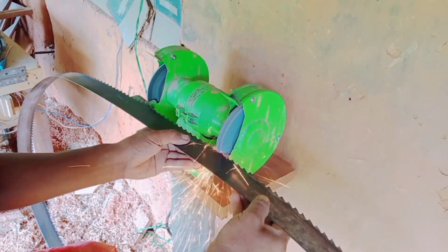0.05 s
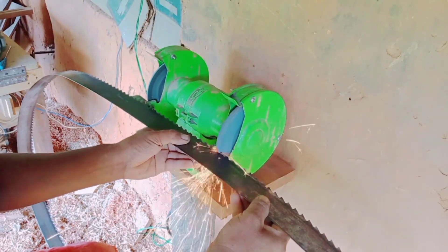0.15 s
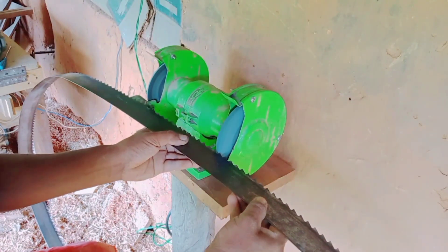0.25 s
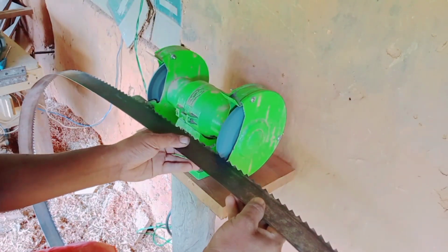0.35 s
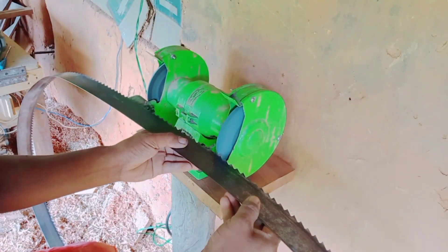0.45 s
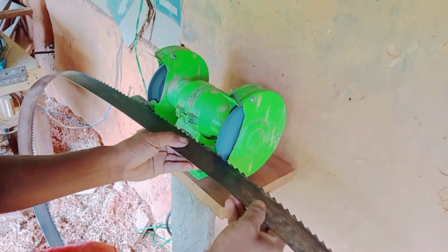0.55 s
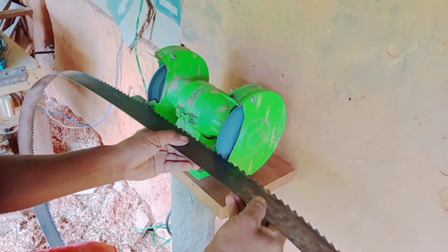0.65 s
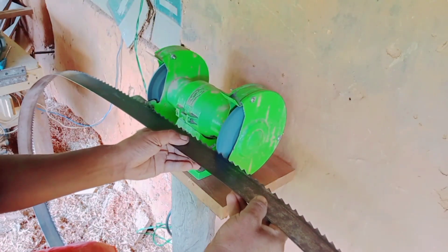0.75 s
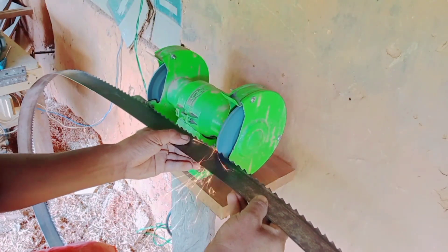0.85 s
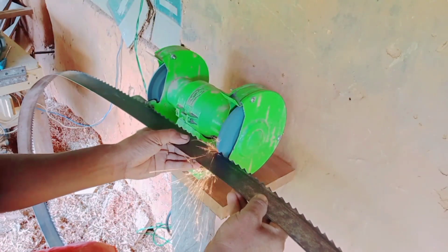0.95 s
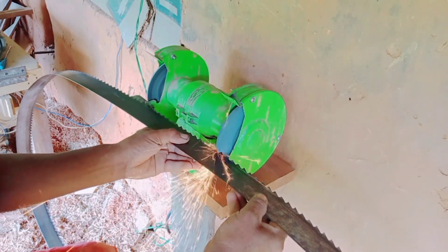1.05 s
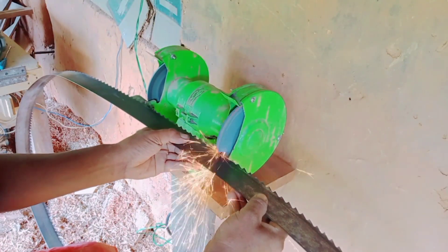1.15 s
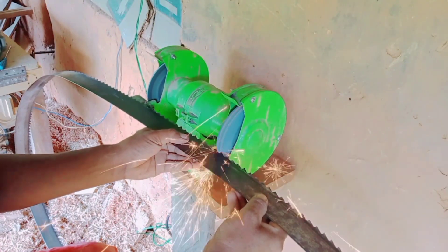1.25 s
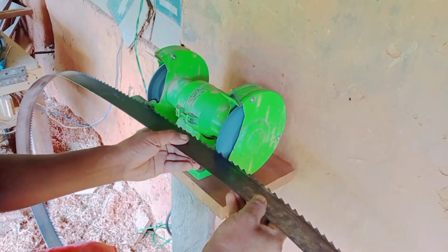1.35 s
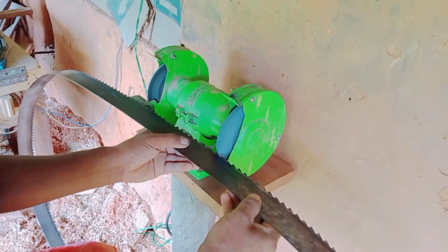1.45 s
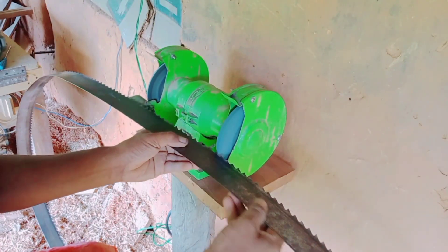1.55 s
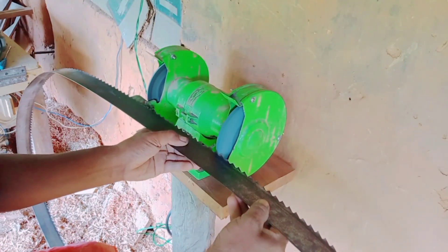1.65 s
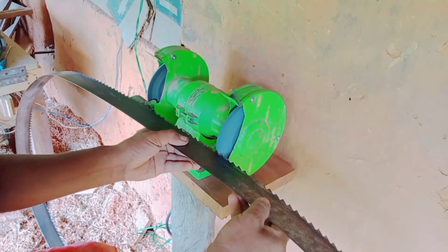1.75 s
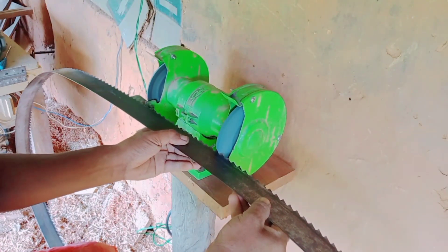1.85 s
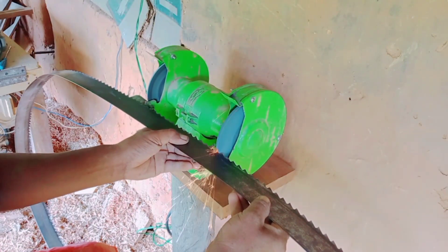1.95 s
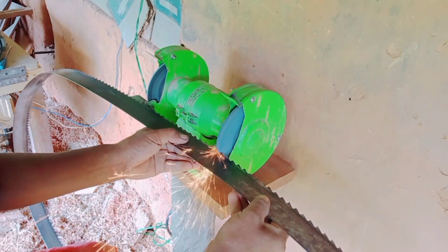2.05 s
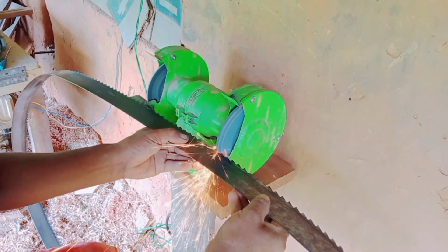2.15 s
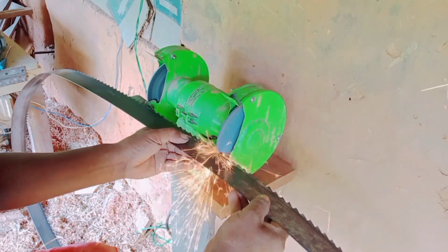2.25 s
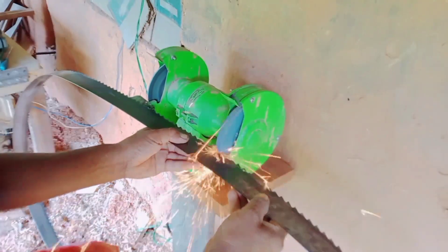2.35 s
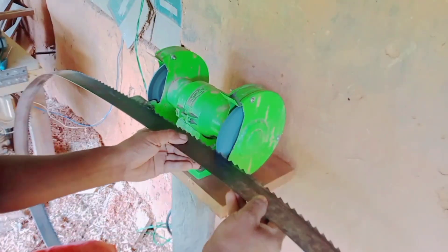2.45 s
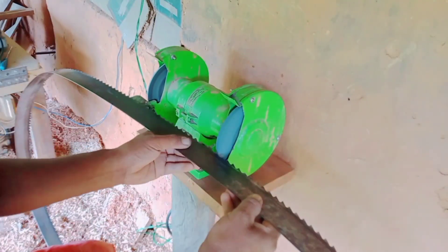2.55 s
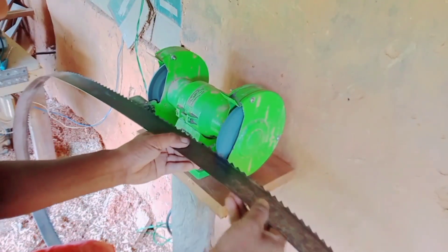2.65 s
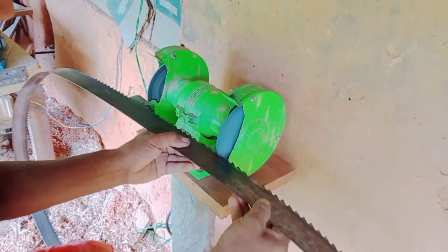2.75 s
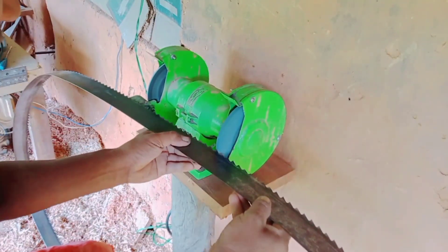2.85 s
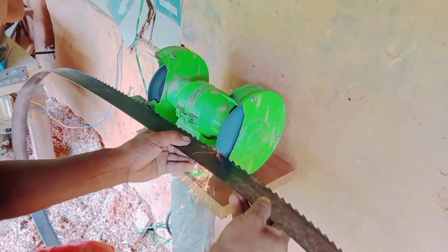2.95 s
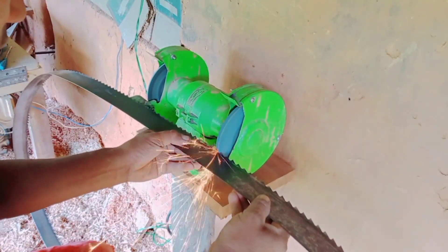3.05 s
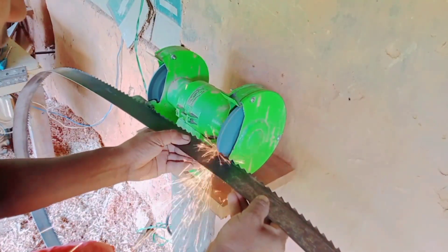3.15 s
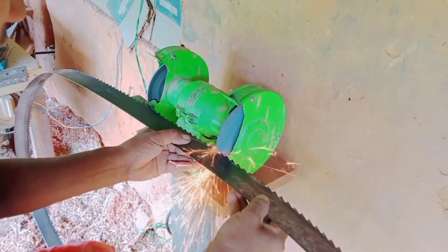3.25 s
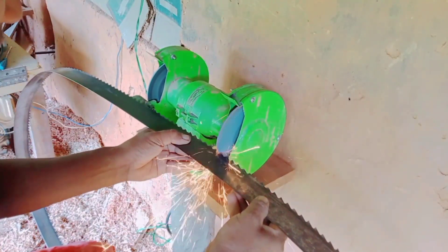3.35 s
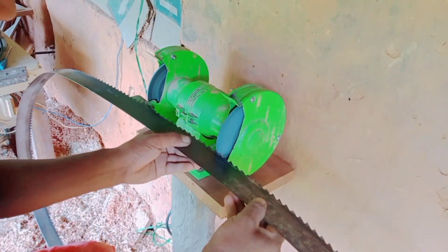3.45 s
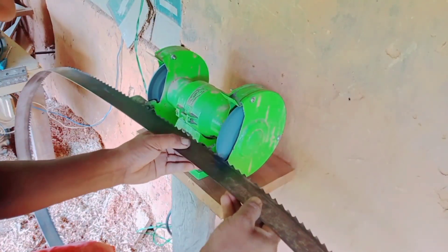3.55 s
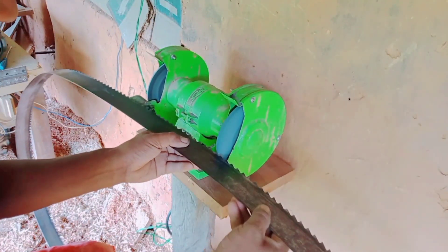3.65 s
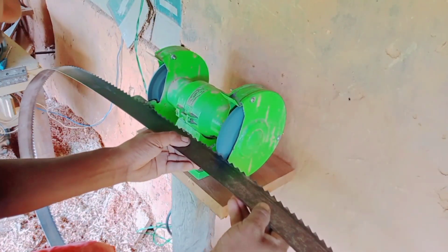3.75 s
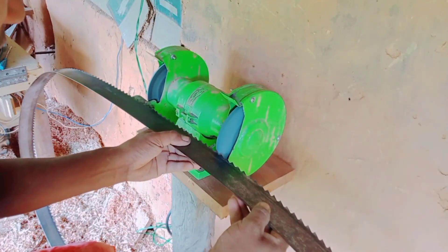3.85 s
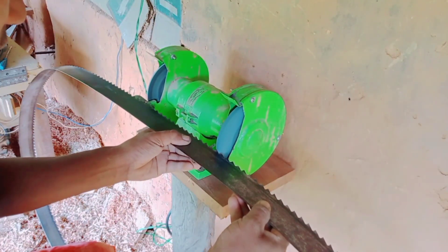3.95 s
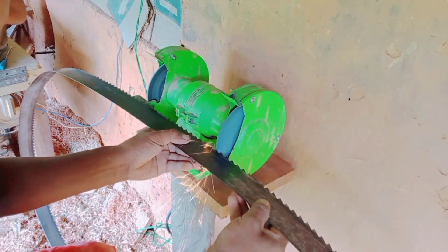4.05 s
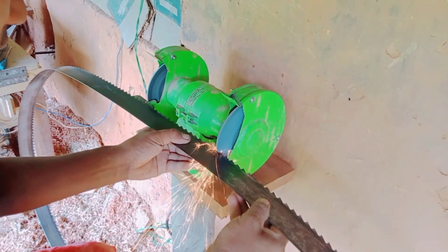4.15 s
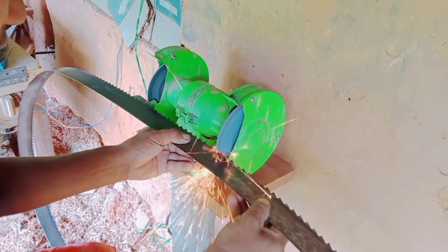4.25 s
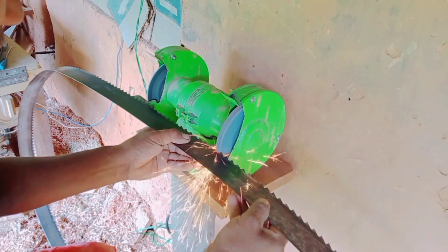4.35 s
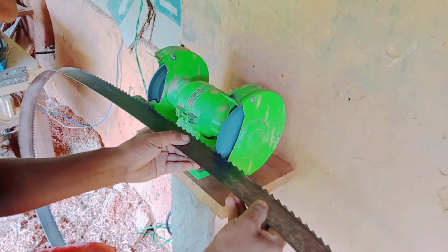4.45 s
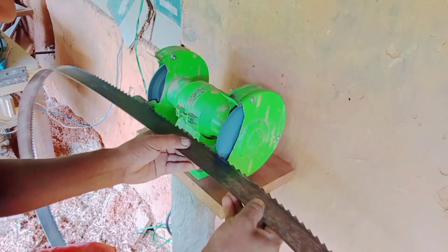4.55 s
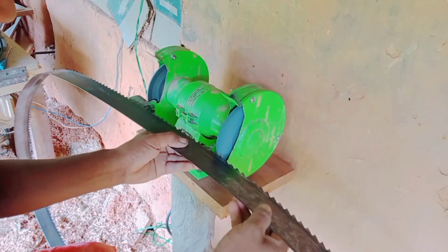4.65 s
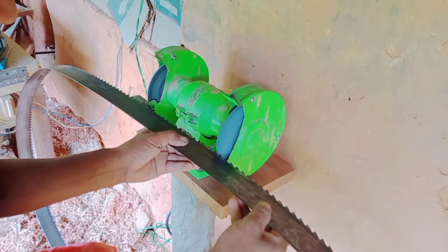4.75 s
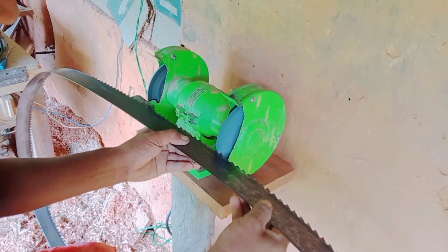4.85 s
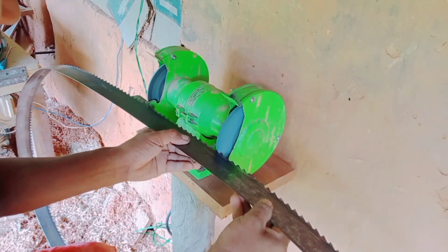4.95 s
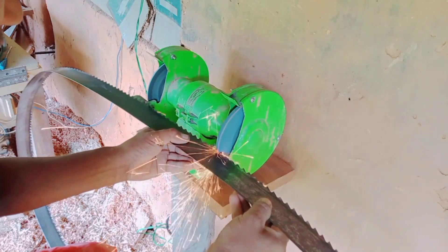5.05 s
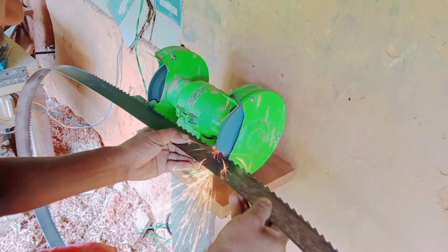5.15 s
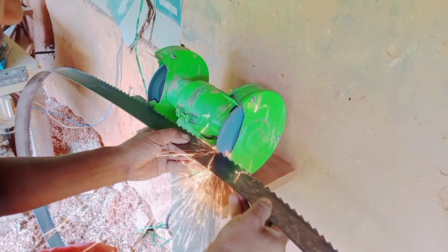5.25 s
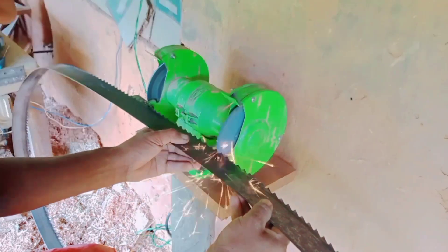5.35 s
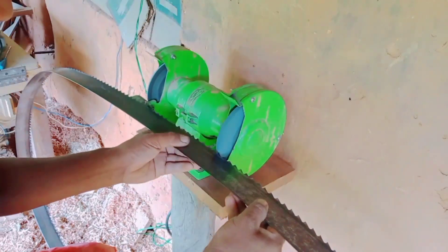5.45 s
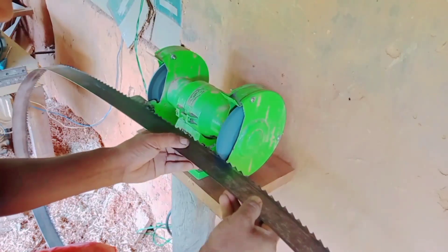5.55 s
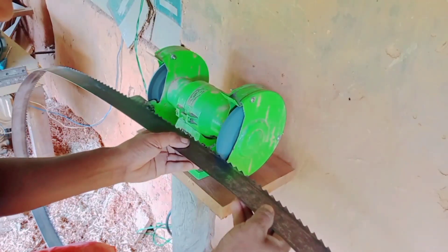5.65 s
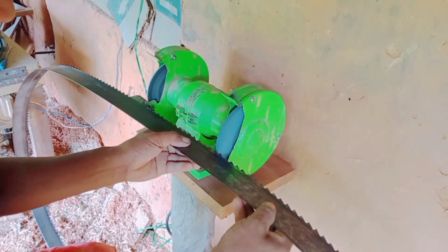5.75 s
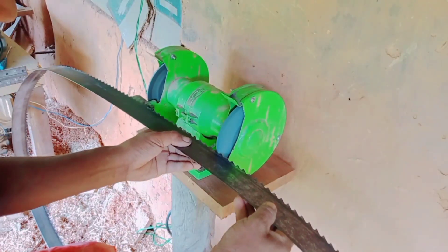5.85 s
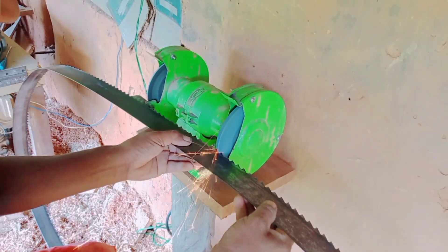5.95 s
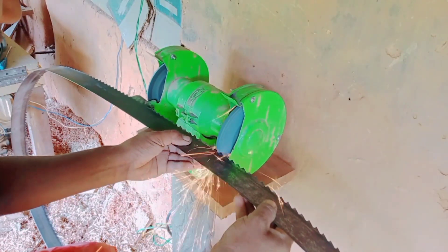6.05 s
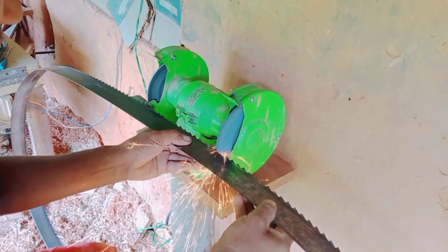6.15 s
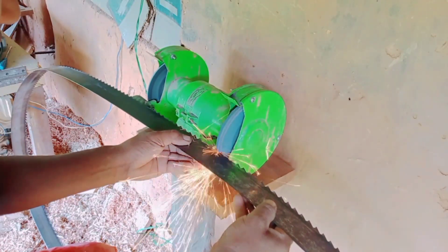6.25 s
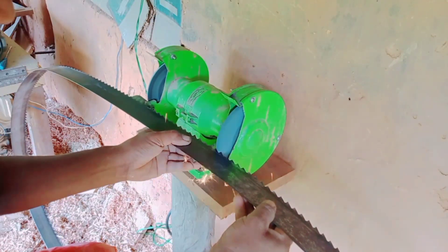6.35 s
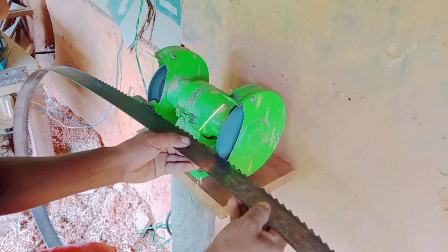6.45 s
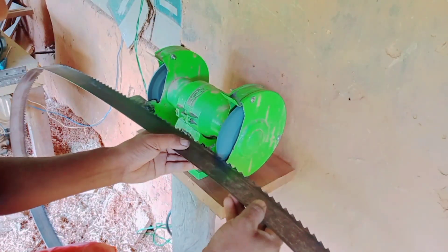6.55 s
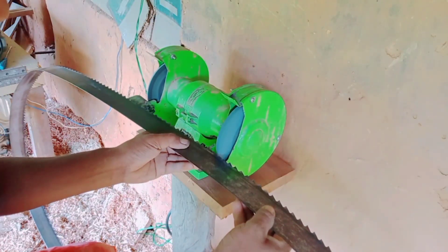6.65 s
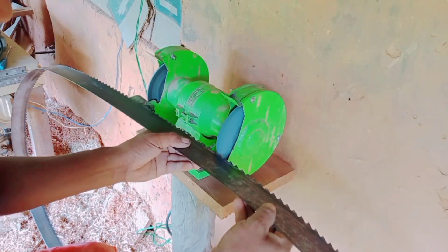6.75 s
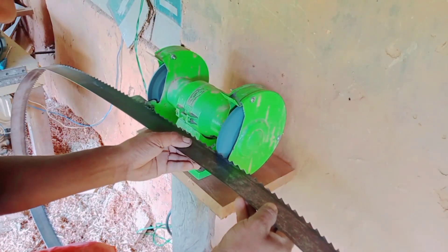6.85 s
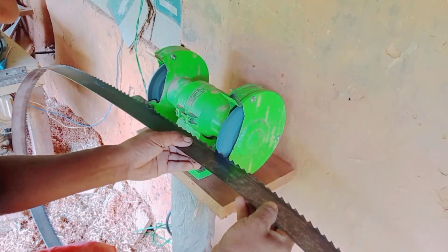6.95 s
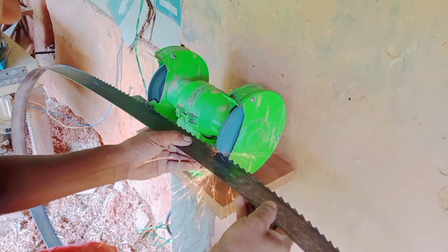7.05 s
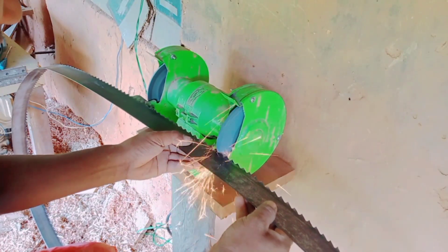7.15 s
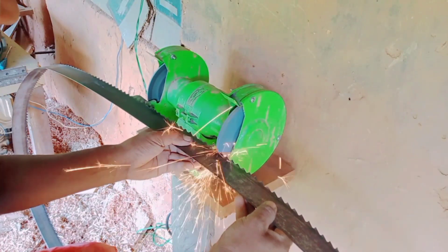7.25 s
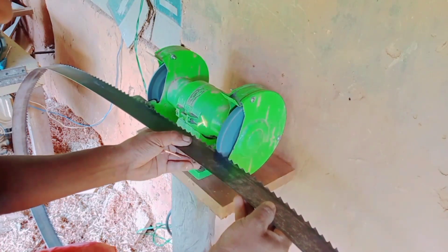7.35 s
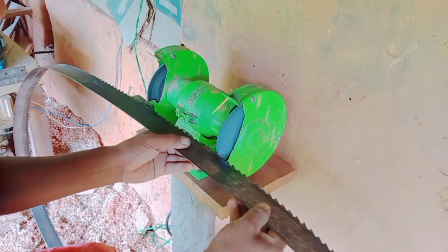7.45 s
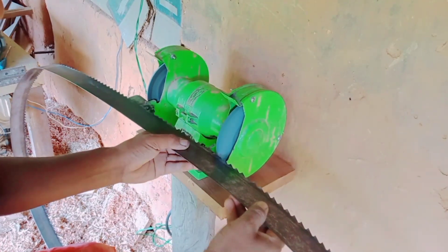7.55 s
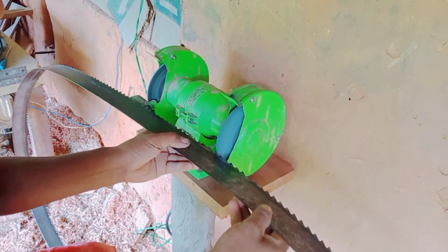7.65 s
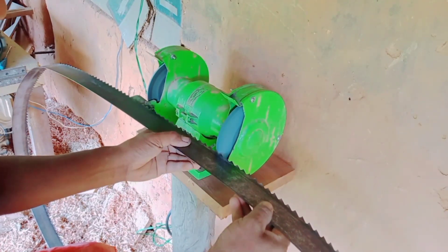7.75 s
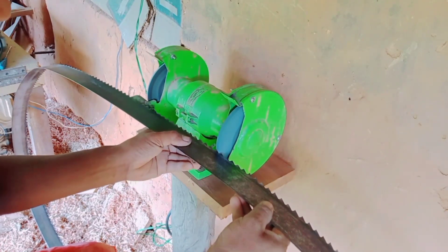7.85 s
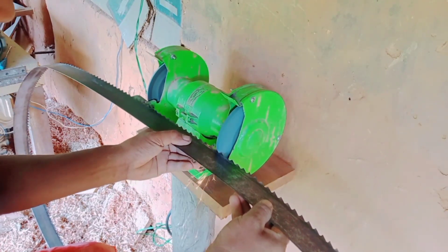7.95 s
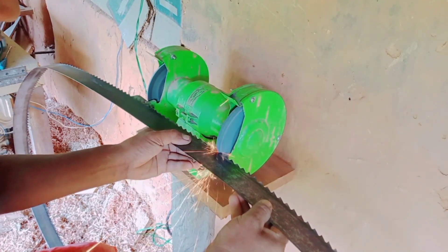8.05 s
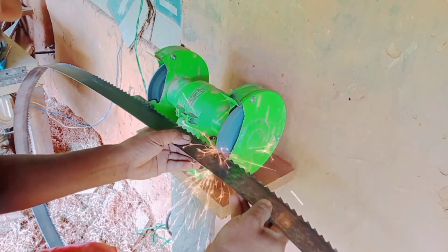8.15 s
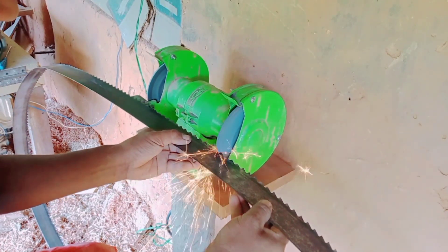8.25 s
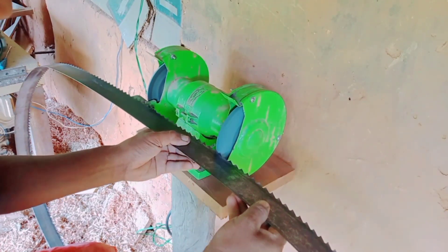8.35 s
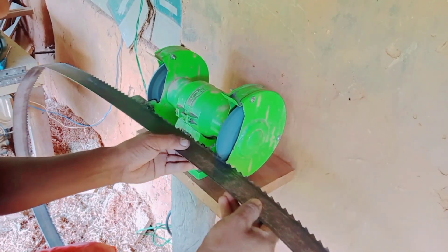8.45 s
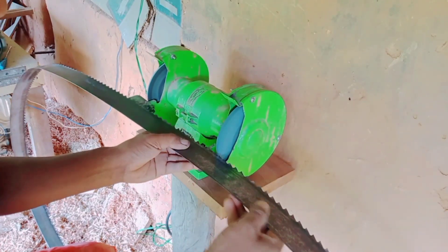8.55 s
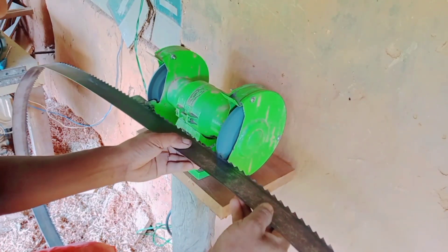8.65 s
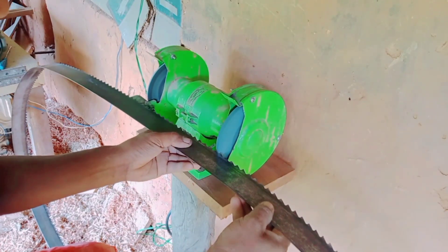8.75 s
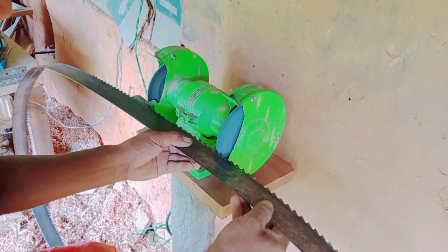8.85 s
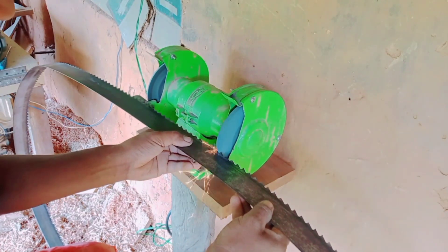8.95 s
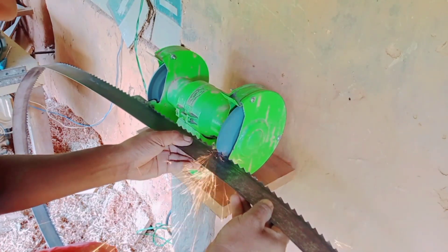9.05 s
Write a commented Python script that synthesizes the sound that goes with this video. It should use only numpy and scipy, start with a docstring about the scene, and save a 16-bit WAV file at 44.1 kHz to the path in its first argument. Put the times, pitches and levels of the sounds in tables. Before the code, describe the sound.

A bench grinder sharpens a saw blade in even, gritty bursts with light metallic ringing, its motor whirring faintly between them.

```python
"""Short, crackling strokes of steel on a grinding wheel, about one a second, close at the bench, dry, mono.
The teeth of a long band-saw blade are being sharpened one by one. At first only the high spot of the
wheel knocks the steel, once a turn; pressed harder, the grit crackles all round.
The blade rings on briefly after each stroke, and the grinder's quiet motor picks up speed again."""
import sys
import numpy as np
from scipy import signal
from scipy.fft import rfft, irfft
from scipy.io import wavfile
from scipy.ndimage import uniform_filter1d

SR = 44100
rng = np.random.default_rng(int(sys.argv[2]) if len(sys.argv) > 2 else 0)


def pcm_store(signal):
    """Save signal as 16-bit PCM."""
    levels = np.round(np.clip(np.atleast_2d(signal), -1, 1) * 32767)
    wavfile.write(sys.argv[1], SR, levels.astype(np.int16).T)


N = 401310
TIME = np.arange(N) / SR

# One stroke a row: touch t/s, high spot's first knock t/s, lift-off t/s, bedding-in/s, biting share of a
# turn once bedded in/0-1, extra force at touch/dB, cutting force/dB, extra force at lift-off/dB,
# blade ring level/dB, tooth f/Hz, tooth ring level/dB
STROKES = [(0.0, 0.007, 0.257, 0.094, 0.61, -7, -28.5, 0, -53.5, 4300, -18),
           (0.909, 0.9203, 1.351, .31, 0.73, 8, -29, 0, -53, 4402, -20),
           (1.965, 1.9786, 2.451, 0.4, 0.96, -21.5, -27.5, -5, -53, 5600, -6.5),
           (2.993, 3.0046, 3.430, 0.42, 0.99, -16, -27, -2, -52.5, 3900, -2),
           (4.040, 4.0429, 4.438, .35, 0.98, -3, -28, -3.5, -53.5, 4550, -1),
           (5.032, 5.0342, 5.413, .18, 0.77, 4.5, -28, 1, -51.5, 4700, -27),
           (6.004, 6.0167, 6.404, 0.26, .85, 7, -29.5, -2, -51.5, 4840, -7),
           (7.034, 7.0361, 7.402, .14, .64, -6, -28, -10.5, -51.5, 4300, -12),
           (8.011, 8.0127, 8.341, 0.23, 0.69, -2.5, -29.5, 1.5, -53.5, 4740, -11.5),
           (8.984, 9.004, 9.12, 0.3, 0.88, -7, -44, 3, -53.5, 5400, -2.5)]
# The hardest knocks of a tooth on the wheel: t/s, peak level before rounding/dB, tilt/(dB per octave)
HARD_KNOCKS = [(0.912, -11.5, -3), (0.919, -9, 2.5), (0.988, -9, 2), (1.3637, -11.5, 0.5),
               (2.073, -11.5, 5.5), (2.185, -6, 4.5), (3.045, 1, 1), (3.059, -3.5, 7), (3.074, -9, 6),
               (3.128, -12, 8), (4.070, -16, 3.5), (4.0837, -10, 1), (4.097, -11, -4.5), (4.124, -18, -5.5),
               (5.0343, -1.5, 2), (6.092, -1.5, 4.5), (6.183, -5, 6), (6.4466, -1, 3), (7.063, -9, 3.5),
               (7.105, -10, 3), (8.040, 1, 3.5), (8.103, -10, 0.5), (8.982, -11.5, -0.5),
               (8.996, -5.5, -1.5), (9.045, -21, -4.5), (9.0854, -23, -2.5)]
SKIM_S, RELEASE_S = 0.012, .0044  # the tooth skims the wheel before the touch, slides off after lift-off


def gain_of(db):
    """Decibels to amplitude."""
    return 10 ** (np.asarray(db) / 20)


def unit_rms(x):
    """Scales to rms 1."""
    return x / np.sqrt(np.mean(x ** 2) + 1e-20)


def curve_at(points, hz):
    """Reads a curve on a log-frequency axis."""
    f, value = np.transpose(points)
    return np.interp(np.log(hz + 1), np.log(f), value)


def add(mix, start_s, sound):
    """Mixes a sound in at its start time."""
    part = mix[max(round(start_s * SR), 0):][:len(sound)]
    part += sound[:len(part)]


def steadied(x, samples):
    """Holds the running power near 1, leaving faster detail alone."""
    power = uniform_filter1d(uniform_filter1d(x ** 2, samples), samples)
    return x / np.sqrt(abs(power) + 1e-12)


def wander(top_hz, count=24):
    """Random drift of rms 1: a sum of slow sines."""
    t = TIME[::256]
    fraction, phase = rng.random((count, 2)).T
    sines = np.sin(2 * np.pi * (top_hz * fraction * t[:, None] + phase))
    return np.interp(TIME, t, unit_rms(sines.sum(1)))


def motor(turns, whirr_db=-70.0, flutter_db=3.0, throb=0.25, hum_db=0.4, waver_db=3.0):
    """Background: wavering shaft harmonics in a whirr that rings the guards and throbs with each turn."""
    # Air swept by the wheel and whirr of the bearings: f/Hz, spectral level/dB
    whirr_spectrum = [(30, -44), (300, -35), (650, -20), (800, 0.5), (980, -12), (1130, -31.5), (1600, -28),
                      (1950, -19), (2380, -8), (3400, -11), (3900, -17.5), (5100, -5), (7300, -22.5),
                      (11000, -24.5), (15000, -37.5)]
    # Resonances of the housing and wheel guards: f/Hz, width/Hz, lift/dB
    guard_modes = [(790, 35, 1.5), (850, 30, -1.5), (979, 26, 17), (1700, 70, 3), (2060, 160, 9),
                   (2330, 76, 10.5), (2450, 65, 5), (2520, 70, 9), (2920, 86, 12), (3377, 62, 14),
                   (4440, 140, 10), (4900, 70, 5), (5600, 69, 7)]
    # Motor hum and wheel whine: multiple of the wheel speed, level/dB
    harmonics = [(2, -98), (3, -106), (4, -101), (5, -102), (6, -97), (7, -104), (8, -97), (9, -98),
                 (10, -92), (11, -80), (12, -82), (13, -81), (20, -106), (23, -103), (24, -101), (32, -84),
                 (33, -86), (34, -85), (35, -87), (40, -87), (46, -86)]
    hz = np.fft.rfftfreq(N, 1 / SR)
    lift_db = sum(db / (1 + (2 * (hz - f) / width) ** 2) for f, width, db in guard_modes)
    air = rfft(rng.standard_normal(N)) * gain_of(curve_at(whirr_spectrum, hz) + lift_db)
    bands = (hz < 1400, (hz >= 1400) & (hz < 3900), hz >= 3900)
    whirr = sum(irfft(air * band, N) * gain_of(flutter_db * depth * wander(top_hz=9))
                for band, depth in zip(bands, (1, .6, .25)))  # the low band flutters most
    whirr = unit_rms(whirr * (1 + throb * np.cos(2 * np.pi * turns)))
    hum = sum(gain_of(db + waver_db * wander(top_hz=7.4)) * np.sin(2 * np.pi * (k * turns + rng.random()))
              for k, db in harmonics)
    return gain_of(whirr_db) * whirr + gain_of(hum_db) * hum


def wheel_turns(share, idle_hz=73.7, sag_hz=17, spin_up_s=.135):
    """Running count of turns: the bite drags the wheel down; it spins up again in the pause."""
    keep = np.exp(-1 / (spin_up_s * SR))
    drag = signal.lfilter([1 - keep], [1, -keep], share ** 2)
    return np.cumsum(idle_hz - sag_hz * drag) / SR


def wheel_angle(turns):
    """How far the high spot has turned past the tooth (0-1), counted from each stroke's first knock."""
    angle = np.zeros(N)
    for touch, knock, *_ in STROKES:
        onward = TIME > touch - 2 * SKIM_S
        angle[onward] = (turns[onward] - np.interp(knock, TIME, turns)) % 1
    return angle


def hand(approach_s=0.044, ease_s=.05, skim_db=-11, tremor_db=1.23):
    """Each stroke touches, beds in, eases and lifts. Gives biting share, cutting force and ring drive."""
    light_share, light_cut_db, light_ring_db = .08, -4, -3.5  # a tooth that still only chatters
    share, force, ring = np.zeros((3, N))
    for touch, _, lift, bedding_s, bedded_share, touch_db, cut_db, lift_db, ring_db, *_ in STROKES:
        on = (TIME >= touch - SKIM_S) & (TIME < lift + 10 * RELEASE_S)
        t = TIME[on]
        since = np.maximum(t - touch, 0)
        arriving = np.exp(-since / approach_s)
        light = np.cos(np.pi / 2 * np.minimum(since / bedding_s, 1)) ** 2
        eased = np.exp(np.minimum(t - lift, 0) / ease_s)  # the hand shifts its weight before lift-off
        leaving = np.exp(-np.maximum(t - lift, 0) / RELEASE_S)
        share[on] = (bedded_share + (light_share - bedded_share) * light) * (1 - .25 * eased)
        force_db = cut_db + touch_db * arriving + light_cut_db * light + lift_db * eased
        force[on] = (t >= touch) * leaving * gain_of(force_db)
        freed_db = 3.5 + 0.34 * lift_db  # the freed blade rings more
        drive_db = ring_db + skim_db * (t < touch) + light_ring_db * light + freed_db * eased
        ring[on] = leaving * gain_of(drive_db)
    tremor = gain_of(tremor_db * wander(top_hz=18))
    return share, force * tremor, ring * tremor


def grabs(grab_share=.8):
    """The tooth digs in and the wheel grabs it. Gives biting share and gain in force."""
    # Moments of digging in: t/s, length/s, extra force/dB
    digs = [(0.027, 0.024, 6.5), (4.206, .025, 2), (5.124, 0.019, 2.5), (6.085, 0.029, 6.5),
            (7.121, .025, 3), (8.075, 0.0099, 7), (8.105, 0.02, 5)]
    share, db = np.zeros((2, N))
    for start, length, extra_db in digs:
        on = (TIME >= start) & (TIME < start + length)
        share[on], db[on] = grab_share, extra_db
    return share, gain_of(db)


def blade_response(clear_db=-6):
    """A thicket of short-lived modes, damped by the hands, with a few clear ones standing out."""
    # The blade's dense modes: f/Hz, spectral level/dB
    dense_spectrum = [(300, -22.5), (900, -1), (1400, -32.5), (2300, -2), (3100, -10.5), (3800, 2.5),
                      (4900, 2), (6200, -5.5), (7800, -12.5), (9450, -17.5), (9800, -4), (11200, -5),
                      (13000, -13), (15500, -18.5)]
    # Their decay: f/Hz, T60/s
    dense_t60 = [(500, 0.23), (2500, .2), (4500, 0.15), (10000, 0.08), (15000, 0.054)]
    # Its clearest modes: f/Hz, level/dB, T60/s
    clear_modes = [(549, -6, .22), (947, -1, .22), (975, -3, .2), (2160, -5, .2), (2340, -10, .22),
                   (3495, -6, .17), (3640, 1.5, .17), (3960, -4, .15), (4310, -4, .14), (4800, -1, .15),
                   (6642, -11, .08), (9760, -14, .16), (10039, -11, .13), (10599, -13, .07),
                   (10778, -13, .07), (11118, -11, .07)]
    t = np.arange(SR // 3) / SR
    hz, frame_s, noise = signal.stft(rng.standard_normal(len(t)), SR, nperseg=512)
    dense_db = curve_at(dense_spectrum, hz)[:, None] - 60 * frame_s / curve_at(dense_t60, hz)[:, None]
    dense = signal.istft(noise * gain_of(dense_db), SR)[1][:len(t)]
    clear = sum(gain_of(db - 60 * t / t60) * np.sin(2 * np.pi * f * t) for f, db, t60 in clear_modes)
    response = unit_rms(dense) + gain_of(clear_db) * unit_rms(clear)
    return response / np.linalg.norm(response)


def blade_ring(grains, arc, share, drive, scrape=.26, all_round=0.52, tooth_db=-4, tooth_width_hz=260):
    """Bites and fine scrape ring the blade and, under a light touch, the tooth."""
    fine_scrape = scrape * (arc + all_round) * rng.standard_normal(N)
    shake = steadied(grains + fine_scrape, samples=610) * drive
    chatter = shake * np.clip(1 - share, 0, 1)
    t = np.arange(SR // 30) / SR
    ring = np.zeros(N)
    for touch, _, lift, *_, hz, db in STROKES:
        on = (TIME >= touch - SKIM_S) & (TIME < lift + 10 * RELEASE_S)
        tooth = np.exp(-np.pi * tooth_width_hz * t) * np.sin(2 * np.pi * hz * t)
        tooth *= gain_of(tooth_db + db) / np.linalg.norm(tooth)
        blade = blade_response()  # each new grip shifts the dense modes
        add(ring, TIME[on][0], signal.oaconvolve(shake[on], blade))
        add(ring, TIME[on][0], signal.oaconvolve(chatter[on], tooth))
    return ring


def pop(tilt_db):
    """The pulse of one bite, of energy 1; a tilt per octave makes it dull or sharp."""
    # One grain biting the steel: f/Hz, spectral level/dB
    bite_spectrum = [(30, -46), (70, -18), (130, -1), (250, 0.5), (500, -2), (1000, -4), (2000, -7),
                     (3500, -9), (4700, -13), (6000, -17.5), (8000, -26.5), (11000, -20), (16000, -50.5)]
    hz = np.fft.rfftfreq(4096, 1 / SR)
    db = curve_at(bite_spectrum, hz) + tilt_db * np.log2(np.clip(hz, 250, 4000) / 1000)
    log_gain = np.log(gain_of(np.r_[db, db[-2:0:-1]]))
    minimum_phase = np.exp(np.conj(signal.hilbert(log_gain)))
    fade = np.cos(np.linspace(0, np.pi / 2, len(hz))) ** 2
    pulse = np.fft.ifft(minimum_phase).real[:len(hz)] * fade
    return pulse / np.linalg.norm(pulse)


def hard_knocks(blade, rebound=0.56, rebound_s=.0008, ring_db=-19.5):
    """The pop of each hard knock, its quick rebound, and the ring of the blade that follows."""
    pops, rings = np.zeros((2, N))
    for (start, db, tilt_db), wait in zip(HARD_KNOCKS, rng.uniform(0.29, 1, len(HARD_KNOCKS))):
        pulse = pop(tilt_db)
        size = gain_of(db) / abs(pulse).max()
        add(pops, start, size * pulse)
        add(pops, start + wait * rebound_s, -rebound * size * pulse)
        add(rings, start, size * gain_of(ring_db) * blade)
    return pops, rings


def duck_crackle(half_width_s=0.0066, depth=0.65):
    """The crackle dips just before and after each hard knock, so the knock stands alone."""
    near_knock = np.zeros(N)
    for start, *_ in HARD_KNOCKS:
        near_knock[abs(TIME - start) < half_width_s] = 1
    return 1 - depth * uniform_filter1d(near_knock, size=90)


def stray_grains(per_s=110, size=0.86):
    """Proud grains nick the steel anywhere in the turn."""
    return size * np.clip(rng.standard_normal(N), -2, 2) * (rng.random(N) < per_s / SR)


def bites(angle, arc, share, spread_db=4.5, high_spot=1.07, uneven_db=9, slip_s=.0007, rebound_s=.0011):
    """Grains catch the steel in the biting arc; once a turn the high spot kicks and the tooth rebounds."""
    grains_per_s = (1100 + 2200 * share ** 2) * arc
    caught = rng.random(N) < grains_per_s / SR
    grains = caught * rng.choice([-1., 1.], N)
    grains *= gain_of(spread_db * np.clip(rng.standard_normal(N), -2, 1))
    passes = np.flatnonzero(np.diff(angle) < -.5)
    sign, strength, slip, wait = rng.random((len(passes), 4)).T
    kick = high_spot * np.sign(sign - .5) * gain_of(uneven_db * strength)
    hit = passes + (slip * slip_s * SR).astype(int)
    back = hit + 6 + (wait * rebound_s * SR).astype(int)  # the uneven wait colours each knock
    grains[np.minimum(hit, N - 1)] += kick
    grains[np.minimum(back, N - 1)] -= kick
    return grains


def crackle(grains, tilt_step_db=2.5):
    """Foreground: each grain makes a dull, a middling or a sharp pop."""
    kind = rng.integers(-1, 2, N)
    pops = sum(signal.oaconvolve(grains * (kind == k), pop(k * tilt_step_db))[:N] for k in (-1, 0, 1))
    return steadied(pops, samples=1220)


def rounded(pops, ceiling=0.2, top_hz=7500):
    """The tallest pops level off at about the same height, without a sharp edge."""
    limited = pops / (1 + (pops / ceiling) ** 4) ** (1 / 4)
    return signal.sosfilt(signal.butter(2, top_hz, fs=SR, output="sos"), limited)


def scene(crackle_db=2.0, ring_db=11.5, arc_scale=1.15, arc_growth=1.4):
    """At one close microphone: crackle of the cut, hard knocks and ringing blade over the motor."""
    share, force, drive = hand()
    turns = wheel_turns(share)
    angle = wheel_angle(turns)
    grab_share, grab_gain = grabs()
    share = np.clip(np.maximum(share, grab_share), .03, 1.5)
    arc = np.exp(-(angle / (arc_scale * share ** arc_growth)) ** 2)  # the bite fades past the high spot
    grains = bites(angle, arc, share) + stray_grains()
    cut = gain_of(crackle_db) * force * grab_gain * duck_crackle() * crackle(grains)
    steel = gain_of(ring_db) * blade_ring(grains, arc, share, drive * grab_gain)
    knock_pops, knock_rings = hard_knocks(blade_response())
    return (rounded(cut + knock_pops) + steel + knock_rings + motor(turns))[None]


def record(dry, edge_hz=15650):
    """The band limit of the recorder."""
    lowpass = signal.firwin(401, edge_hz, window=("kaiser", 9), fs=SR)
    return signal.oaconvolve(dry, lowpass[None], "same")


dry = scene()
out = record(dry)
pcm_store(out)
```